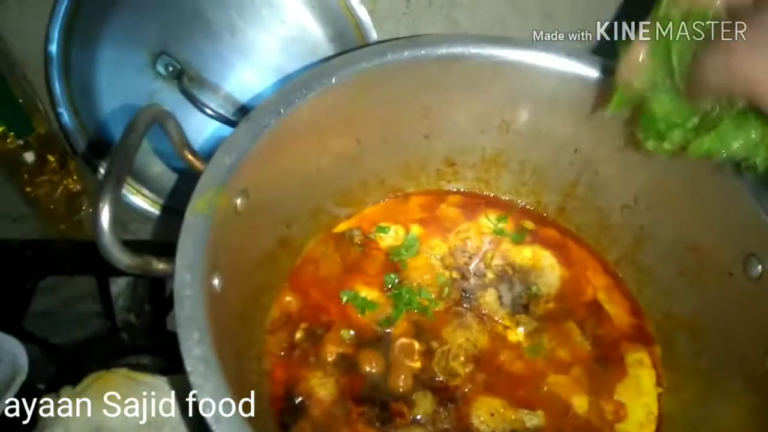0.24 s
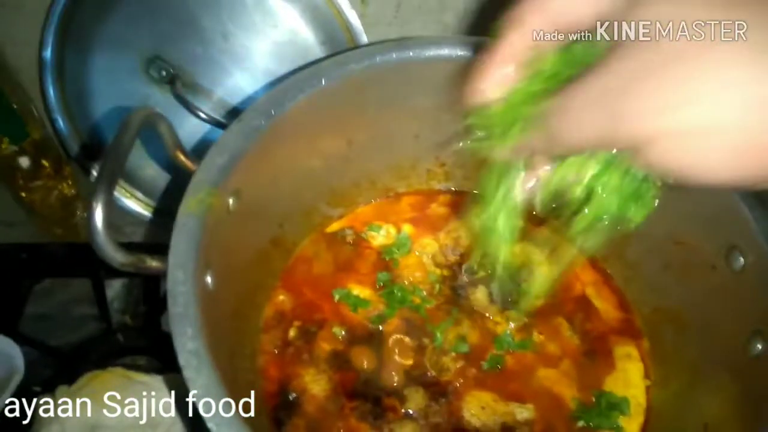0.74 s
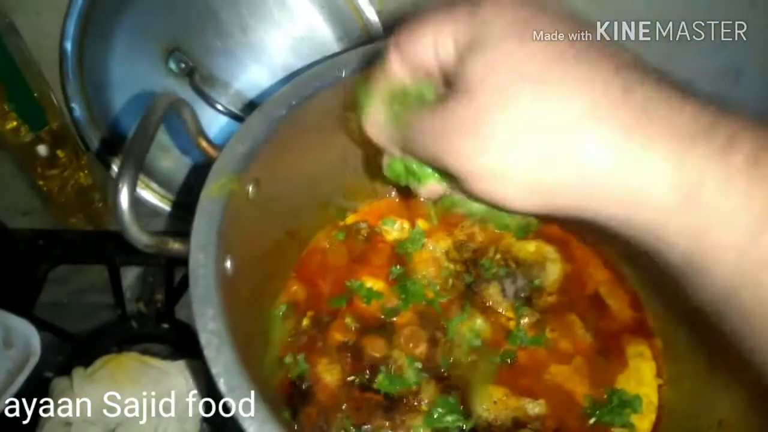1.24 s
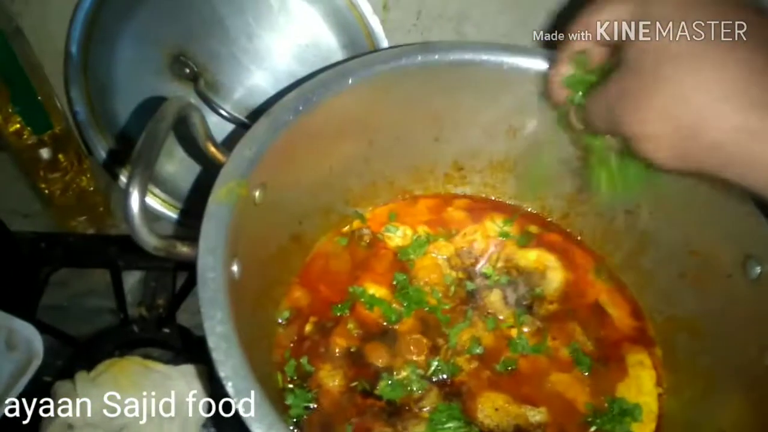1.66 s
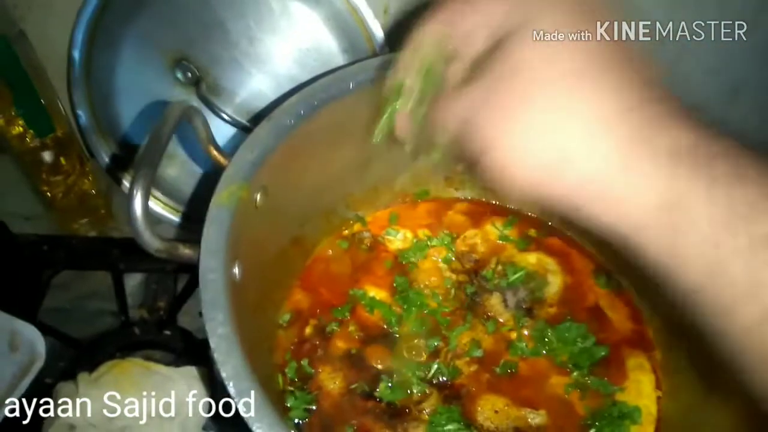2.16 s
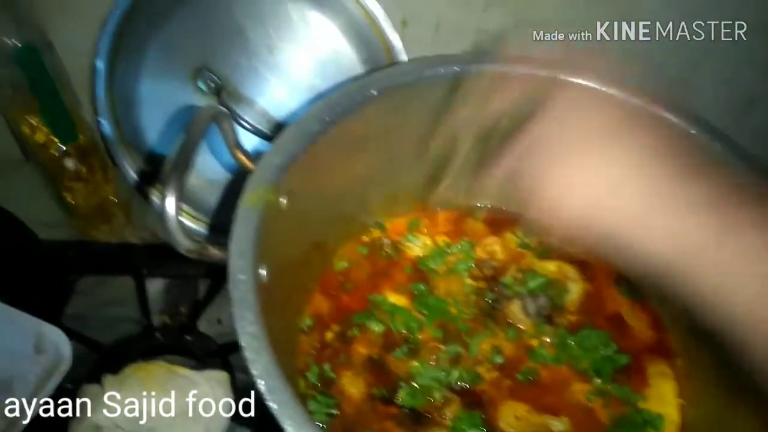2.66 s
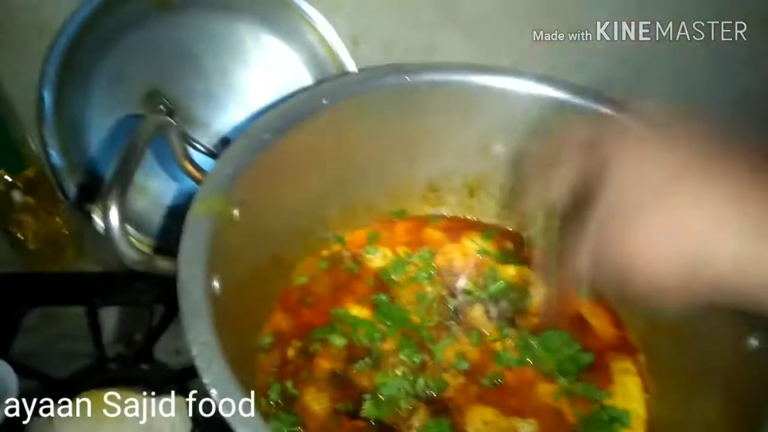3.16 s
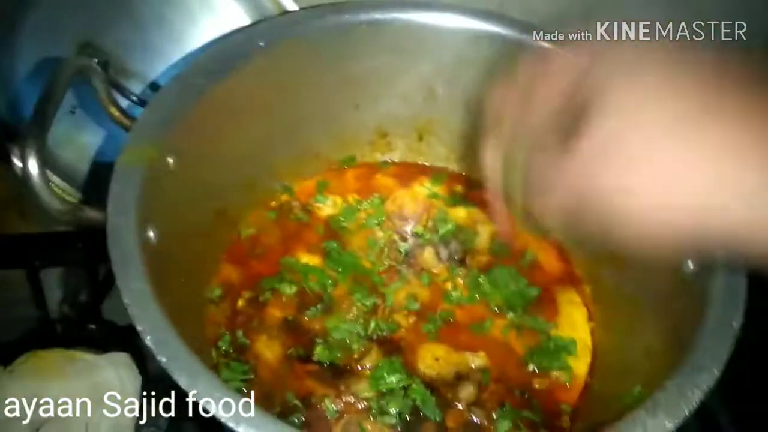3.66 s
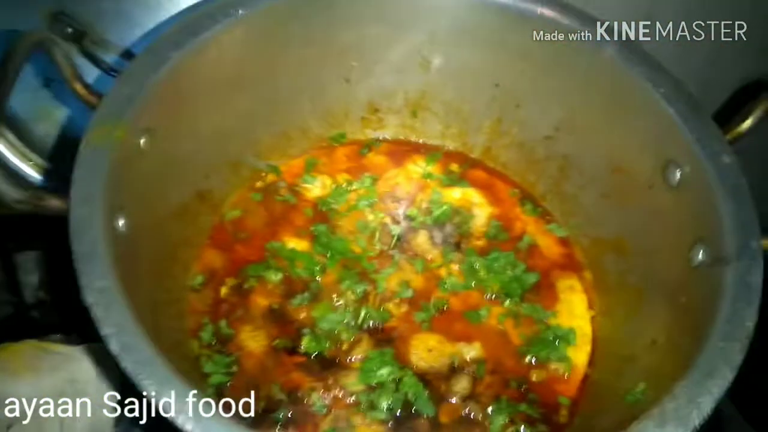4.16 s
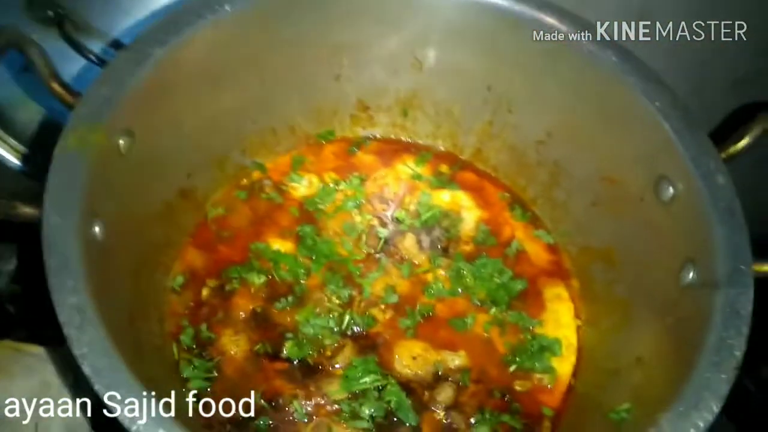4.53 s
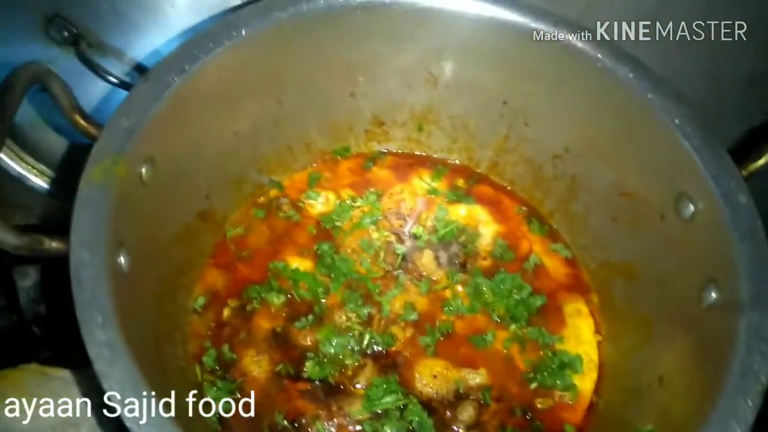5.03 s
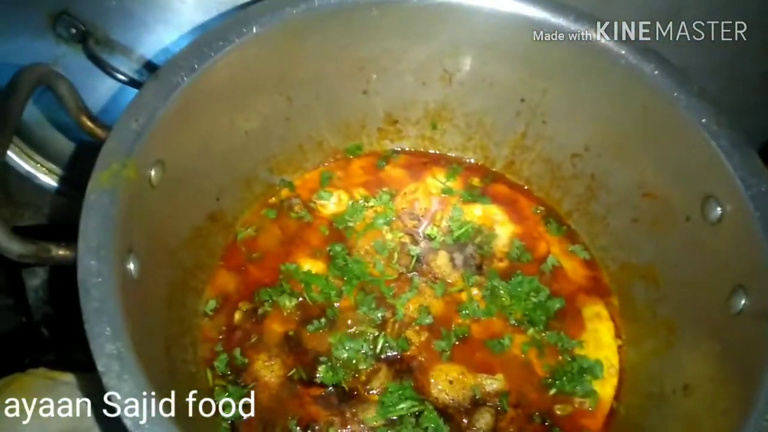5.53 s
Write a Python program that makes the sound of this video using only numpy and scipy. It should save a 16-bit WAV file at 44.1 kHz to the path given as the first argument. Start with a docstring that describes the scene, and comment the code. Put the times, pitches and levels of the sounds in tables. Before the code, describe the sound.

Close simmering sauce churns in short uneven swells, deep fluttering rumble beneath, bubbles popping and oil snapping, then mostly faint low pulses and near silence.

```python
"""At a kitchen gas burner, a curry simmers in a big metal pot and herbs are dropped into it; two channels.
The churning sauce (random bursts and bubble notes), the low rumble of the burner (a wandering drone and noise)
and the fizz of the oil (crackle and tiny notes) are heard in short swells, with near silence between.
Bubbles gulp and pop as damped notes, oil ticks as short bursts, and the pot rings briefly after each.
Wet spits are decaying sprays of random grains; a faint steady hush of noise lies behind it all."""
import sys
import numpy as np
from scipy import signal
from scipy.fft import rfft, irfft, next_fast_len
from scipy.io import wavfile
from scipy.ndimage import map_coordinates

SR = 44100
rng = np.random.default_rng(int(sys.argv[2]) if len(sys.argv) > 2 else 0)


def generate_wav(sig):
    """Save sig (samples, or channels by samples) to the path in sys.argv[1] as 16-bit PCM at SR."""
    pcm = np.round(np.clip(np.atleast_2d(sig).T, -1, 1) * 32767).astype(np.int16)
    wavfile.write(sys.argv[1], SR, pcm)


N = 255339

# longer swells of rumble and churn: [start t/s, length t/s, rumble level/dB, churn level/dB]
LONG_SWELLS = [(0.085, 0.077, -61, -38), (0.161, 0.415, -32.5, -39.5), (0.593, 0.097, -40.5, -45),
               (0.792, 0.434, -39.5, -38.5), (1.444, 0.52, -40, -42.5), (1.545, 0.31, -26.5, -41.5),
               (2.046, 0.13, -32.5, -37.5), (2.204, 0.18, -44, -47.5), (2.437, 0.22, -28.5, -39),
               (2.693, 0.58, -29.5, -40), (5.37, 0.285, -48, -49), (5.394, 0.21, -27.5, -42)]
# single short swells, low rumble and churn rising together: [t/s, rumble level/dB]
SHORT_SWELLS = [(0.011, -34), (0.181, -17.5), (0.265, -18.5), (0.454, -17), (0.613, -23.5), (0.723, -30),
                (0.802, -28.5), (0.901, -26.5), (1.16, -26), (1.27, -49.5), (1.322, -35.5), (1.625, -22),
                (1.698, -21), (2.082, -17.5), (2.15, -24.5), (2.21, -36.5), (2.283, -27), (2.344, -30.5),
                (2.405, -28.5), (2.471, -22), (2.604, -19), (2.72, -21), (2.925, -20.5), (2.982, -19),
                (3.163, -25.5), (3.412, -43), (3.458, -40), (3.517, -50.5), (3.81, -26.5), (3.894, -39),
                (3.978, -29), (4.079, -24.5), (4.152, -28), (4.216, -38), (4.34, -44), (4.42, -41.5),
                (4.49, -43.5), (4.544, -39), (4.611, -23), (4.682, -26.5), (4.762, -39), (4.822, -44.5),
                (4.933, -46), (4.978, -40.5), (5.045, -45), (5.097, -35.5), (5.654, -47), (5.726, -39.5)]
# colour of the churning sauce: [f/Hz, level/dB]
CHURN_SPECTRUM = [(40, -43.5), (80, -2), (120, -4.5), (165, -12.5), (205, -23), (260, -17), (400, -20.5),
                  (500, -18.5), (640, -24.5), (830, -27.5), (950, -30), (1400, -27), (1800, -32),
                  (2400, -37), (4000, -46.5), (7000, -49), (12000, -100)]
# standing waves of the air in the pot: [f/Hz, width f/Hz, lift level/dB]
AIR_MODES = [(237, 12, 8.5), (316, 58, 6), (368.7, 11, 2), (469, 63, 5.5), (582, 31, 4), (764, 25, 7),
             (864, 39, 5.5), (1096, 110, 4), (1281, 58, 4), (1500, 25, 0)]
# how far the microphone looks down into the pot: [t/s, level/dB of the upper standing waves]
OVERLOOK = [(0, -12.5), (2.9, -8.5), (3.5, 1), (4.151, 6), (4.7, 7.5), (5.1, -20), (5.79, 3.5)]
# big slow bubbles in the sauce: [t/s, level/dB before a common trim, pitch f/Hz]
GULPS = [(0.089, -25.5, 462), (0.162, -26, 138), (0.233, -24.5, 140), (0.302, -27, 318), (0.39, -24, 450),
         (0.546, -29, 288), (0.974, -25, 466), (1.064, -22.5, 474), (1.104, -26, 452), (1.791, -20.5, 453),
         (2.282, -27.5, 288), (2.334, -29, 337), (2.402, -22, 384), (2.77, -27, 370), (2.926, -23.5, 440),
         (2.989, -23.5, 401), (3.124, -27, 426), (3.156, -26, 415), (5.081, -33, 418), (5.54, -24.5, 149),
         (5.713, -27.5, 314)]
# small bubbles bursting: [t/s, level/dB before panning, pitch f/Hz, left-right level/dB, ring/cycles]
POPS = [(0.215, -33, 4450, -20, 1.6), (0.2399, -46, 1750, -20, 2.1), (0.627, -27.5, 1950, -29, 0.78),
        (0.8266, -49, 1400, -6.0, 2), (0.907, -10.5, 4660, -14, 1.5), (1.0054, -33, 2260, -17, 1.4),
        (2.299, -32.5, 1800, -25, 3.3), (2.524, -33.5, 1660, -26, 2.3), (3.1725, -27.5, 4550, -16, 2.7),
        (4.0974, -38, 4540, 6, 1.74), (4.548, -47.5, 3040, -8.5, 1.6), (4.6077, -36, 3790, -28, 1.3),
        (5.7305, -37, 5140, -23, 0.45)]
# ticks of hot oil: [t/s, level/dB before panning, pitch f/Hz]
TICKS = [(0.1251, -32.5, 7200), (0.3297, -31.5, 8100), (0.4266, -32, 8350), (0.702, -23.5, 11000),
         (0.708, -28, 10100), (0.899, -15.5, 13930), (0.937, -11.5, 14340), (1.0077, -18, 7380),
         (1.0094, -17.5, 13840), (1.485, -26, 7400), (1.513, -25, 15100), (1.6386, -33, 8200),
         (1.6693, -33.5, 6440), (1.746, -31.5, 7500), (1.8792, -27.5, 6840), (1.886, -22, 10970),
         (2.7357, -34, 6600), (2.9259, -31.5, 14200), (3.025, -37.5, 7750), (3.51, -43, 7840),
         (3.782, -43.5, 8140), (4.0323, -36.5, 8540), (5.4273, -34.5, 8850), (5.458, -34, 7900)]
# wet spits and splashes of sauce: [t/s, level/dB, 60 dB decay t/s, hollow part against spray level/dB]
SPITS = [(0.624, -44.5, 0.13, 1.5), (0.878, -60.5, 0.048, 22), (0.9, -42, 0.28, 8),
         (0.986, -44.5, 0.21, -10), (2.299, -77, 0.16, 14), (2.523, -82, 0.37, 10), (3.174, -30, 0.25, -17),
         (4.606, -49.5, 0.045, -14)]
# colour of the spray in a spit: [f/Hz, level/dB]
SPRAY_SPECTRUM = [(900, -42), (1600, -7.5), (2300, 0), (3400, 0), (4600, 3), (8000, -3), (11000, -11),
                  (15500, -12)]
# colour of the hollow splash under it: [f/Hz, level/dB]
SPLASH_SPECTRUM = [(500, -22), (1000, -14), (1600, 2), (2100, -7.5), (2900, 0.5), (4000, -27.5),
                   (8000, -45.5)]
# swells of the oil's sizzle: [start t/s, length t/s, level/dB]
SIZZLES = [(0, 0.028, -56), (0.102, 0.084, -54), (0.312, 0.09, -60.5), (0.417, 0.14, -44),
           (0.601, 0.075, -50), (0.693, 0.051, -44), (0.754, 0.092, -59), (0.898, 0.29, -45.5),
           (1.274, 0.068, -53.5), (1.456, 0.091, -51), (1.57, 0.11, -49.5), (1.745, 0.081, -56.5),
           (1.884, 0.061, -49), (2.448, 0.17, -61.5), (2.686, 0.13, -52), (2.91, 0.4, -58.5),
           (3.44, 0.092, -60), (3.784, 0.072, -52), (3.88, 0.12, -58.5), (3.958, 0.16, -52),
           (4.37, 0.166, -68.5), (4.582, 0.1, -65), (4.814, 0.05, -65.5), (5.02, 0.14, -66),
           (5.402, 0.17, -57)]
# colour of the oil's crackle: [f/Hz, level/dB]
FIZZ_SPECTRUM = [(1500, -4), (3500, -3.5), (4800, -26.5), (6200, -4.5), (7800, 1.5), (10000, 9.5),
                 (13000, 8), (15000, 10.5)]
# colour of the burner's flutter: [f/Hz, level/dB]
RUMBLE_SPECTRUM = [(20, -9.5), (45, -6.5), (60, -6), (80, -1.5), (108, 2), (135, -12.5), (170, -13.5),
                   (215, -23.5), (300, -62)]
# the microphone passes less deep bass: [f/Hz, level/dB]
BASS_CUT = [(20, -12.5), (40, -1.5), (55, -5), (72, -0.5)]
# decay of the pot's reflections: [f/Hz, 60 dB decay t/s]
POT_DECAY = [(400, 0.16), (2000, .23), (5000, .22), (8000, 0.091), (15000, 0.043)]
# how alike left and right are: [f/Hz, likeness 0 to 1]
LIKENESS = [(80, 0.98), (350, 0.96), (600, 0.6), (1200, 0.027), (4000, 0.06), (12000, .1)]
# colour of the kitchen hush: [f/Hz, level/dB]
HUSH_SPECTRUM = [(20, -25.5), (50, -28), (80, -21.5), (130, -1.5), (230, -23), (310, -8.5), (370, -13.5),
                 (450, -11), (650, -18.5), (1200, -19.5), (3000, -27), (9000, -32), (12000, -37),
                 (15500, -47.5)]

TOP_HZ = 15900  # upper band limit
FLAME_HZ = 77.64  # centre of the drone's wandering pitch
RISE_S, FALL_S = 0.0044, 0.013  # time constants of a long swell or a sizzle setting in and dying away
# random throb of the long swells: knots a second, depth in the rumble and in the churn
THROB_RATE, THROB_DB, CHURN_THROB_DB = 22, 0.5, 2.54
# half length of a short swell of -30 dB; one this much stronger lasts twice as long
SHORT_S, SHORT_DOUBLES_DB = 0.015, 22.5
# churn of a short swell: level against its rumble, ceiling, length against its rumble
CHURN_DB, CHURN_TOP_DB, CHURN_STRETCH = -4.5, -41.5, 1.92
IDLE_DB = -64.5  # centre of the faint, randomly wavering level of rumble between swells
SIZZLE_SAG_DB_PER_S, SIZZLE_WAVER_DB = 38.5, 3  # a sizzle wanes and wavers
OPEN_DB, SINK = -45, 0.4  # below this churn the sizzle sinks too, by this many dB for each dB
# fizz that goes with all churning: level at a churn of OPEN_DB, dB gained for each dB of churn
FIZZ_DB, FIZZ_GROWS = -75, 0.76


def surges():
    """Strength of rumble and churn: long throbbing swells, single short swells, a faint unsteady level between."""
    waver = amp(5 * wobble(40))
    throb = wobble(THROB_RATE)
    idle = amp(IDLE_DB) * waver
    rumble_power = idle ** 2
    churn_power = (idle * amp(CHURN_DB)) ** 2
    rumble_throb, churn_throb = amp(THROB_DB * throb), amp(CHURN_THROB_DB * throb)
    for start, length, rumble_db, churn_db in LONG_SWELLS:
        gain = held(start, length)
        rumble_power += (amp(rumble_db) * gain * rumble_throb) ** 2
        churn_power += (amp(churn_db) * gain * churn_throb) ** 2
    for s, db in SHORT_SWELLS:
        half = SHORT_S * 2 ** ((db + 30) / SHORT_DOUBLES_DB)
        rumble_part = amp(db) * swell(s, half, order=2)
        churn_part = amp(min(db + CHURN_DB, CHURN_TOP_DB)) * swell(s, half * CHURN_STRETCH, order=4)
        rumble_power += rumble_part ** 2
        # the stronger churn prevails
        churn_power = np.maximum(churn_power, churn_part ** 2)
    return np.sqrt(rumble_power), np.sqrt(churn_power)


def churn(level):
    """Soft bursts and a dense swarm of small gurgles in thick sauce, coloured by the hollow of the pot."""
    bursts = np.array([grains(rate=1800, scatter_db=0.5) for side in range(2)])
    gurgles = np.array([cloud(rate=260, hz=893, octaves=1.335, cycles=5.4, scatter_db=5.5)
                        for side in range(2)])

    def standing_waves(hz):
        lifts = (db * np.exp(-2 * ((hz - centre) / width) ** 2) for centre, width, db in AIR_MODES)
        return amp(sum(lifts))

    thick = coloured(bursts + amp(-12.5) * gurgles, CHURN_SPECTRUM)
    sauce = unit(filtered(thick, standing_waves))
    # the upper standing waves beam straight up out of the pot
    beam = [(520, -56.5), (720, -1.0), (1350, -22.5), (2200, -14.0)]  # [f/Hz, level/dB]
    upper = filtered(sauce, lambda hz: amp(along(beam, hz)))
    overlook = amp(np.interp(np.arange(N) / SR, *np.transpose(OVERLOOK)))
    return level * amp(-1.0) * spread(sauce + overlook * upper) * panned(balance_db=-2)


def gulps():
    """Big bubbles open slowly with a short, low note, with the pot's answer."""
    out = np.zeros(N)
    for s, db, hz in GULPS:
        add(out, s, amp(db - 7.5) * bubble(hz, cycles=3.6, rise=0.064, attack_cycles=0.77))
    return out * panned(balance_db=-2) + amp(-8) * pot(out)


def pops():
    """Small bubbles burst: film tears, cavity rings briefly; returns the direct sound and the pot's answer."""
    out = np.zeros((2, N))
    for s, db, hz, balance_db, cycles in POPS:
        cavity = amp(db) * bubble(hz, cycles=cycles, rise=0.06, attack_cycles=2.4)
        tear = amp(db - 21.5) * snap(hz * 1.39, width_hz=820, decay=0.006)
        add(out, s, cavity * panned(balance_db))
        add(out, s, tear * panned(balance_db))
    return out, amp(-4.0) * pot(out.mean(0)) * panned(balance_db=-7.0)


def ticks():
    """Droplets of oil snap on the hot metal; returns the direct sound and the pot's answer."""
    out = np.zeros(N)
    for s, db, hz in TICKS:
        add(out, s, amp(db) * snap(hz, width_hz=820, decay=0.00055))
    return out * panned(balance_db=-30.0), amp(-5.5) * pot(out) * panned(balance_db=-12.0)


def spits():
    """Steam or falling leaves break the surface: a puff of droplets over a hollow splash."""
    spray, splash = np.zeros(N), np.zeros(N)
    t = np.arange(SR // 4) / SR
    for s, db, t60, hollow_db in SPITS:
        puff = amp(db - 60 * t / t60)
        add(spray, s, puff)
        add(splash, s, puff * amp(hollow_db))

    def droplets(spectrum):
        return coloured(np.array([grains(rate=2500, scatter_db=4) for side in range(2)]), spectrum)

    wet = spray * droplets(SPRAY_SPECTRUM) + splash * droplets(SPLASH_SPECTRUM)
    return wet * panned(balance_db=-10.5)


def fizz(level):
    """Fine crackle and tiny ringing bubbles of oil along the hot wall, with their haze of reflections."""
    beads = cloud(rate=180, hz=9820, octaves=0.66, cycles=2.0, scatter_db=5.5)
    crackle = unit(coloured(grains(rate=800, scatter_db=4.0), FIZZ_SPECTRUM) + amp(-3.5) * beads)
    direct = crackle * panned(balance_db=-28.5)
    haze = amp(6.5) * pot(crackle) * panned(balance_db=-15.5)
    return level * (direct + haze)


def burner(level):
    """The flame drives one low resonance under the pot; its pitch wanders, over a rougher flutter."""
    knots = rng.standard_normal(int(N * 30 / SR) + 4)
    wander = map_coordinates(knots, [np.arange(N) * 30 / SR])  # 30 knots a second
    drone = unit(np.sin(2 * np.pi * np.cumsum(FLAME_HZ * (1 + 0.098 * wander)) / SR))
    # part of the flutter reaches both microphones alike, part differs
    flutter = coloured(rng.standard_normal((3, N)), RUMBLE_SPECTRUM)
    rumble = amp(-1.0) * drone + amp(-7.5) * flutter[0] + amp(-10) * flutter[1:]
    swelling = level * rumble * panned(balance_db=-3.5)
    return filtered(swelling, lambda hz: amp(along(BASS_CUT, hz)))


def kitchen_hush():
    """Faint steady noise, alike at both sides in the bass and nearly unrelated in the treble."""
    return amp(-66.5) * spread(coloured(rng.standard_normal((2, N)), HUSH_SPECTRUM))


def pot(x):
    """Dense reflections between the metal walls, different at each microphone."""
    hz, t, z = signal.stft(rng.standard_normal((2, SR // 2)), SR, nperseg=256)
    decay = amp(-60 * t / along(POT_DECAY, hz)[:, None])
    tail = signal.istft(z * decay, SR, nperseg=256)[1]
    return signal.fftconvolve(x[None], tail / np.linalg.norm(tail[0]), axes=1)[:, :N]


def bubble(hz, cycles, rise, attack_cycles):
    """A bubble rings for some cycles while its pitch rises; peak 1."""
    turns = hz * np.arange(SR // 8) / SR
    life = turns / cycles
    note = np.sin(2 * np.pi * turns * (1 + rise * (1 - np.exp(-life / 2))))
    ring = note * np.exp(-life) * (1 - np.exp(-turns / attack_cycles)) ** 2
    return ring / np.abs(ring).max()


def cloud(rate, hz, octaves, cycles, scatter_db):
    """A random swarm of bubbles, each a damped note of its own pitch and size; rms 1."""
    draws = rng.random((int(rate * N / SR), 3))
    start = (draws[:, :1] * N).astype(int)
    pitch = hz * 2 ** (octaves * (2 * draws[:, 1:2] - 1))
    size = amp(-scatter_db * np.log(draws[:, 2:] + 0.04))
    n = np.arange(int(6 * cycles * SR / hz))
    turns = pitch * n / SR
    ring = size * np.sin(2 * np.pi * turns) * np.exp(-turns / cycles) * (1 - np.exp(-turns))
    return unit(np.bincount((start + n).ravel(), ring.ravel(), N)[:N])


def snap(hz, width_hz, decay):
    """A rough burst around one pitch with a quick swell and a decay in seconds; peak 1."""
    t = np.arange(1024) / SR
    freqs = np.fft.rfftfreq(len(t), 1 / SR)
    peak = 1 / (1 + ((freqs - hz) / width_hz) ** 2)
    band = (peak + 0.031 * (freqs > hz / 2)) * (freqs < TOP_HZ)
    rough = signal.hilbert(irfft(rfft(rng.standard_normal(len(t))) * band))
    envelope = (1 - np.exp(-t / 0.00093)) * (np.exp(-t / decay) + 0.11 * np.exp(-t / 0.0021))
    # partly even out the noise's own envelope
    burst = rough.real / np.abs(rough) ** 0.6 * envelope
    return burst / np.abs(burst).max()


def grains(rate, scatter_db):
    """Single-sample bursts at random moments, a few far stronger than the rest; rms 1."""
    size = amp(scatter_db * np.minimum(rng.exponential(size=N), np.pi))
    return unit((rng.random(N) < rate / SR) * size * rng.choice([-1, 1], N))


def wobble(rate):
    """A smooth random curve, rate knots a second."""
    return map_coordinates(rng.standard_normal(1024), [np.arange(N) * rate / SR], mode="mirror")


def held(start, length, sag_db_per_s=0):
    """A gain that rises, holds or sags for its length, and dies away."""
    t = np.arange(N) / SR - start
    rise = 0.5 + 0.5 * np.tanh(t / RISE_S / 2)
    fall = np.exp(-np.maximum((t - length) / FALL_S + 1, 0))
    return rise * fall * amp(-sag_db_per_s * np.maximum(t, 0))


def swell(s, half, order):
    """A gain that peaks at time s: round for order 2, flat-topped for order 4."""
    out = np.zeros(N)
    near = np.arange(max(int((s - 3 * half) * SR), 0), min(int((s + 3 * half) * SR), N))
    out[near] = np.exp(-np.abs((near / SR - s) / half) ** order)
    return out


def spread(pair):
    """Two unrelated sounds as one field: alike in the bass, nearly unrelated in the treble."""
    def mid_side(hz):
        turn = np.arccos(np.clip(along(LIKENESS, hz), -1, 1)) / 2
        return np.array([np.cos(turn), np.sin(turn)])

    mid, side = filtered(pair, mid_side)
    return np.array([mid + side, mid - side])


def panned(balance_db):
    """Left and right gains whose mean is 1."""
    gains = amp([[balance_db / 2], [-balance_db / 2]])
    return gains / gains.mean()


def add(track, s, sound):
    """Mix a sound into a track at time s."""
    start = int(np.clip(round(s * SR), 0, N - 1))
    track[..., start:start + sound.shape[-1]] += sound[..., :N - start]


def coloured(x, spectrum):
    """x with a spectrum, at rms 1."""
    return unit(filtered(x, lambda hz: amp(along(spectrum, hz))))


def filtered(x, response):
    """x times a response of frequency."""
    m = next_fast_len(N + SR // 2)
    return irfft(rfft(x, m) * response(np.fft.rfftfreq(m, 1 / SR)), m)[..., :N]


def along(points, hz):
    """(Hz, value) points read on a log axis."""
    f, v = np.transpose(points)
    return np.interp(np.log(hz + 1), np.log(f + 1), v)


def unit(x):
    """x at rms 1."""
    return x / np.sqrt(np.mean(x ** 2) + 1e-20)


def amp(db):
    """Decibels to gain."""
    return 10 ** (np.asarray(db) / 20)


def scene():
    """Burner rumble, churn, fizz and bubbles in shared swells, over a faint kitchen hush."""
    rumbling, churning = surges()
    # sizzle, spits and ringing sink away with the churn between swells
    vigour = churning / amp(OPEN_DB)
    presence = np.minimum(vigour, 1)
    sizzles = sum(amp(db) * held(start, length, SIZZLE_SAG_DB_PER_S) for start, length, db in SIZZLES)
    churn_fizz = amp(FIZZ_DB) * vigour ** FIZZ_GROWS
    sizzling = np.hypot(presence ** SINK * sizzles, churn_fizz) * amp(SIZZLE_WAVER_DB * wobble(30))
    simmer = churn(churning) + fizz(sizzling) + burner(rumbling)
    pop, pop_ring = pops()
    tick, tick_ring = ticks()
    sinking = presence * (pop_ring + tick_ring + spits())
    return simmer + gulps() + pop + tick + sinking + kitchen_hush()


def record(dry):
    """The phone keeps nothing above its band limit; the treble fades out over the last 300 Hz."""
    return filtered(dry, lambda hz: np.clip((TOP_HZ - hz) / 300, 0, 1))


dry = scene()
out = record(dry)
generate_wav(out)
```